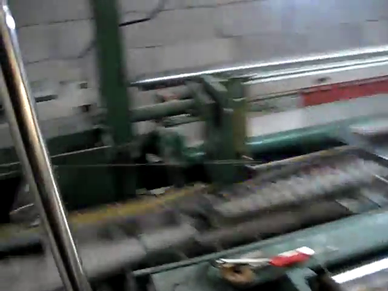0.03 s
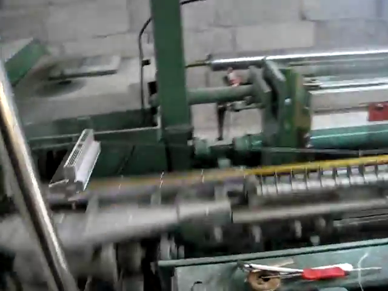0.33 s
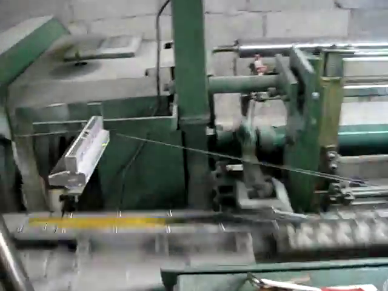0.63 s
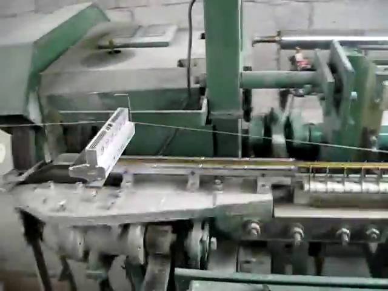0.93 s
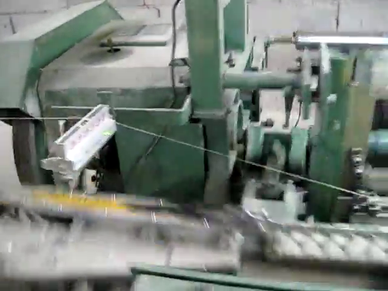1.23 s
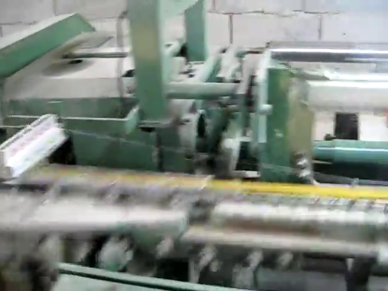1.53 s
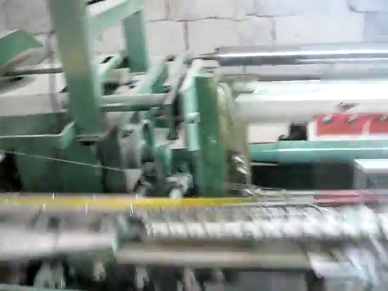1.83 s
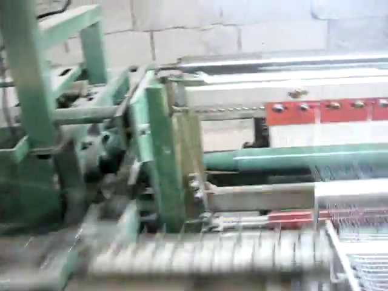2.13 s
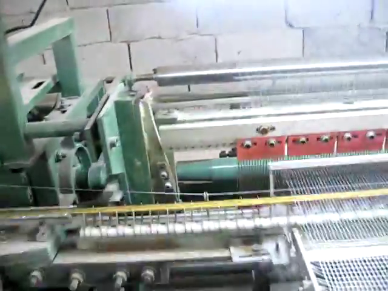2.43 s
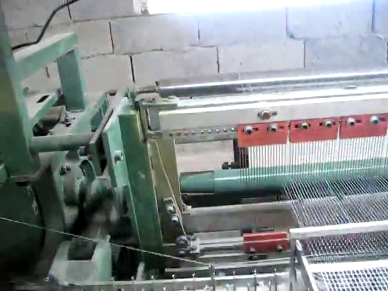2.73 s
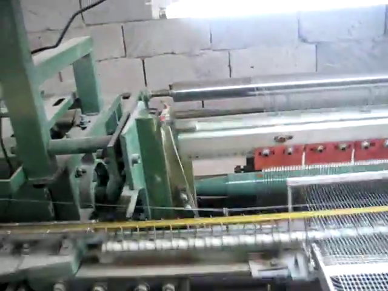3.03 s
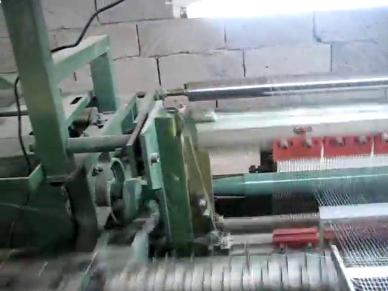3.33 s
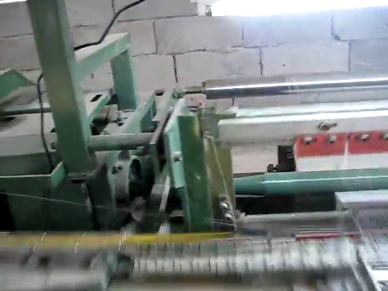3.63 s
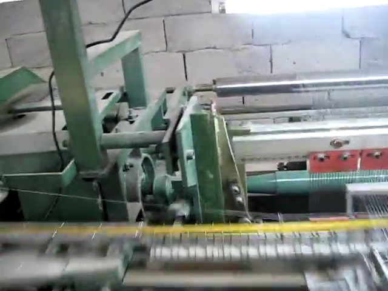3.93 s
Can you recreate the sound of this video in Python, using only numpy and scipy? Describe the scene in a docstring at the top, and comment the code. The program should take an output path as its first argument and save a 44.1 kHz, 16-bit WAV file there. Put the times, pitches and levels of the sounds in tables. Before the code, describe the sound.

Close to the microphone, a loud weaving loom clatters steadily over grinding gears. Hissing strokes, short metal squeals and sharp clacks repeat about twice a second, the clacks echoing briefly off the workshop walls.

```python
"""A rapier loom weaves close by in a block-walled shed, about two turns a second, over droning gears
and a motor. Each turn opens with a rush from the drive, and the rapiers (rods that carry the thread)
hiss in. A catch snaps, the sley (the swinging comb) rumbles, dry guides squeal and, in most turns,
a sheet-metal cover booms. Then steel parts meet in a quick run of clacks as the rapiers hiss out.
Now and then a lever knocks, a spring whistles or a loose part ticks."""
import sys
import numpy as np
from scipy import signal
from scipy.fft import rfft, irfft
from scipy.io import wavfile

SR = 44100
rng = np.random.default_rng(int(sys.argv[2]) if len(sys.argv) > 2 else 0)


def wav_out(sig):
    """Save sig, one row per channel (or a flat mono array), as 16-bit PCM at SR to the path in sys.argv[1]."""
    wavfile.write(sys.argv[1], SR, np.round(np.clip(np.atleast_2d(sig).T, -1, 1) * 32767).astype(np.int16))


N = 176400
T = np.arange(N) / SR

# Turns of the main shaft. Each row: start in seconds, then how many dB louder or softer this turn
# makes the drive, rapiers, sley, clacks, squeaks, cover and squeal.
SHAFT_TURNS = [(0, -1, -0.5, 2, -2, -0.5, 3.5, 2.5), (0.5171, -1.5, 0, -0.5, -2.5, 2, 1.5, 3),
               (1.032, -3.5, 0, 3, -3.5, 0.5, 0, 2), (1.5487, -4, 0, 2, -3.5, 1.5, -6, 3.5),
               (2.065, -4.5, -0.5, 1, -2, 1, -24, 0), (2.5815, -1.5, -1.5, 1.5, -3.5, 1.5, -11, 2.5),
               (3.0988, -3, -0.5, 0.5, -2, -0.5, -3.5, -2), (3.615, -3.5, -1, 2, -2.5, 2, -23, -2.5)]
# Notes at which the cast frame rings. Each row: pitch in Hz, width in Hz, boost in dB.
FRAME_NOTES = [(280.7, 17, 6.5), (372, 7.1, 5), (892, 11, 4.5), (1090, 20, 1), (1205, 12, 4),
               (1425, 39, 5.5), (1670, 56, 5), (1960, 23, 3.5)]

# The tone colour of each part's noise. Each row: frequency in Hz, relative strength there in dB.
GEAR_COLOUR = [(25, -48), (160, -8), (280, -3), (500, -2.5), (900, 0.5), (1300, -0.5), (1900, 3.5),
               (3000, 1), (5000, -0.5), (7000, -3), (9000, -5), (11500, -4), (13000, -1), (14500, -24),
               (16000, -5.5)]
COVER_COLOUR = [(330, -36), (362, -4), (374, 6), (385, -13), (420, -25), (700, -16.5), (880, -8),
                (1100, -18), (4000, -46)]
GUIDE_COLOUR = [(3000, -35), (5500, -26), (7300, 10), (8600, 7), (10000, 0), (11500, 10.5), (13000, 12.5),
                (16000, -18)]
SLEY_COLOUR = [(25, -34), (50, -12), (100, -13.5), (180, -8), (290, -2), (400, -1), (550, -4), (850, 2.5),
               (1400, -5), (2800, -4.5), (7000, -17.5), (16000, -44)]
DRIVE_COLOUR = [(200, -13), (500, -9), (900, 3), (1400, -0.5), (2100, -1.5), (2900, -6.5), (5000, -11),
                (9000, -52)]
RAPIER_COLOUR = [(500, -28), (1800, -6.5), (3500, -5), (6500, -2.5), (9000, -1.5), (11000, 4), (12800, 4.5),
                 (14500, -7.5), (16000, -5)]
KNOCK_COLOUR = [(300, -13), (1700, -3.5), (2300, 5), (3200, -15), (4100, 0), (5200, -6), (16000, -23)]
CATCH_COLOUR = [(200, -21), (1400, -2), (3000, -16), (4700, -3.5), (6200, -18), (10100, -3), (10800, -11),
                (11500, 0), (12900, 7), (13900, -3), (14300, -10)]

# Moments when a moving part is loudest.
# Each row: seconds into the turn, level in dB, rise time in seconds, fall time in seconds.
COVER_SWELLS = [(.285, -32.5, 0.086, 0.06)]
GUIDE_SWELLS = [(.222, -29.5, 0.022, 0.02), (.29, -25, 0.039, 0.021)]
SLEY_SWELLS = [(.022, -26, 0.016, 0.042), (.19, -28.5, 0.032, 0.013), (.272, -26.5, 0.027, 0.063),
               (.302, -29, 0.0061, 0.011), (.356, -26.5, 0.019, 0.021), (.46, -33.5, 0.051, 0.056)]
DRIVE_SWELLS = [(-.005, -21, 0.032, 0.017), (.033, -20, 0.014, 0.022), (.19, -25, 0.0064, 0.04)]
RAPIER_SWELLS = [(.04, -21, 0.021, 0.058), (.09, -20, 0.039, 0.055), (.36, -19, 0.014, 0.0066),
                 (.41, -19.5, 0.034, 0.051), (.475, -25.5, .03, 0.028)]

# Parts that ring or squeak. Each row: delay in seconds, pitch in Hz, slide in Hz per second, level in dB,
# rise in seconds, seconds to fade by 60 dB, flutter speed in Hz, roughness (0 is pure, 1 or more is rough).
SQUEAK_NOTES = [(.002, 1650, 10000, -22.5, 0.037, 0.075, 130, 0.7),
                (.008, 954, 3000, -28, 0.018, .07, 90, 0.7), (.024, 1507, 0, -24, .002, .09, 110, .8),
                (0.178, 4025, 0, -24.5, 0.0018, 0.2, 300, 1),
                (0.178, 2425, 0, -24, 0.0033, 0.079, 200, 0.8),
                (0.207, 11400, 0, -20.5, 0.0038, 0.084, 220, 0.6),
                (.212, 2820, -2500, -24.5, 0.016, 0.2, 130, .85),
                (0.256, 7400, -7000, -25.5, 0.0091, .16, 190, 1.2)]
# A dry guide sings faintly, squeals and breaks up. The rows read like the squeaks.
SQUEAL_NOTES = [(.254, 4430, 0, -31, .02, .3, 70.2, 0.67), (0.284, 4320, 2800, -19.5, 0.02, 0.09, 60, 0.23),
                (.309, 4670, 0, -21.5, 0.0024, 0.083, 280, 0.9)]
# The low and the high note of a spring. The rows read like the squeaks.
SPRING_NOTES = [(0, 6715, 0.0022, 0, 0.0054, 0.19, 30.02, 0.32), (0, 11300, 0, 0, 0.004, 0.12, 30, .15)]
# Whistles of that spring. Each row: start in seconds, low note's level in dB, high note's level in dB.
SPRING_WHISTLES = [(0.312, -40, -15.5), (1.344, -23, -16), (2.893, -40, -20), (3.41, -30, -17),
                   (3.927, -24, -25)]

# Ticks of loose parts, and knocks of the levers. Each row: start in seconds, level in dB.
LOOSE_TICKS = [(1.41, -7), (1.9505, -15), (2.6755, -22), (2.702, -4)]
LEVER_KNOCKS = [(0.176, -20), (1.7268, -17), (1.9046, -17), (2.2413, -19), (2.4215, -17), (2.9252, -19),
                (3.452, -17), (3.9686, -17)]
# Steel hitting steel in every turn. Each row: seconds into the turn, thud level in dB,
# clank level in dB, tick level in dB, rise in seconds, seconds to fade by 60 dB.
STEEL_HITS = [(.125, -59, -34, -26, 0.00083, 0.035), (0.1766, -30, -17.5, -26, 0.00052, 0.046),
              (0.3095, -28, -16, -13, 0.0011, 0.047), (.3440, -21.5, -15, -18, 0.0003, 0.039),
              (0.3534, -21.5, -22, -21, 0.00024, 0.056), (0.3769, -21, -10.5, -3, 0.00093, 0.0096),
              (0.3837, -40, -11, -4.5, 0.00026, 0.011)]


def from_db(db):
    """Turn decibels into a number to multiply the sound by."""
    return 10 ** (np.asarray(db) / 20)


def unit_power(x):
    """Scale a signal so that its average power is 1."""
    return x / np.sqrt(np.mean(x ** 2) + 1e-20)


def dying(t, fade_s):
    """A curve that falls by 60 dB every fade_s seconds."""
    return np.exp(-np.log(1000) * t / fade_s)


def drift(hz, size):
    """A smooth random wobble, mostly slower than hz."""
    freqs = np.arange(size // 2 + 1) * SR / size
    return unit_power(irfft(rfft(rng.standard_normal(size)) / (1 + (freqs / hz) ** 2), size))


def add(out, start_s, sound):
    """Mix a sound in at the given time."""
    i = max(int(start_s * SR), 0)
    out[i:i + len(sound)] += sound[:max(N - i, 0)]


def band_pass(x, band_hz):
    """Keep one band of frequencies, boosted so that white noise keeps its power."""
    sos = signal.butter(2, band_hz, "band", fs=SR, output="sos")
    return signal.sosfilt(sos, x + 1e-18) * np.sqrt(SR / 2 / (band_hz[1] - band_hz[0]))


def rubbing(colour, grain_db):
    """Friction: coloured noise broken into tiny grains. More grain_db makes it grittier."""
    hz, db = np.transpose(colour)
    grains = rng.standard_normal(N) * from_db(grain_db * drift(hz=340, size=N))
    freqs = np.maximum(np.arange(N // 2 + 1) * SR / N, 1)
    gains = from_db(np.interp(np.log(freqs), np.log(hz), db))
    return unit_power(irfft(rfft(grains) * gains, N))


def shed_echo(x, fade_s=0.67, level_db=-5.5):
    """The block walls throw the sound back as a dull wash, starting 8 ms later."""
    t = np.arange(SR) / SR
    tail = rng.standard_normal(SR) * dying(t, fade_s) * (t > .008)
    tail /= np.sqrt(np.sum(tail ** 2))
    dull_tail = signal.sosfilt(signal.butter(1, 4000, fs=SR, output="sos"), tail)
    return from_db(level_db) * signal.fftconvolve(x, dull_tail)[:N]


def ringing_frame(x):
    """The cast frame rings along with its parts, boosting its own notes."""
    return x + sum((from_db(db) - 1) * signal.lfilter(*signal.iirpeak(hz, hz / width, fs=SR), x)
                   for hz, width, db in FRAME_NOTES)


def motor_hum(hz=49.8, level_db=-66.5):
    """The motor hums on one faint, low note."""
    return from_db(level_db) * np.sqrt(2) * np.sin(2 * np.pi * hz * T)


def gear_drone(level_db=-25.5):
    """The gears rub all the time, making a steady, grainy noise."""
    return from_db(level_db) * rubbing(GEAR_COLOUR, grain_db=2.5)


def moving_part(starts, turn_db, swells, colour, turn_s=.5163):
    """A part rubs louder as it gathers speed, at the same points of every turn."""
    power = np.zeros(N)
    for start, db in zip(starts, turn_db):
        for peak_s, level_db, rise_s, fall_s in swells:
            t = T - start - peak_s
            near = np.abs(t) < turn_s / 2
            width_s = np.where(t[near] < 0, rise_s, fall_s)
            power[near] += from_db(db + level_db) ** 2 * np.exp(-(t[near] / width_s) ** 2)
    return np.sqrt(power) * rubbing(colour, grain_db=2)


def singing_parts(starts, levels_db, notes, spread_db=1.0, detune=.0005):
    """Springs and guides sing briefly, some cleanly and some as a rough scrape."""
    out, t = np.zeros(N), np.arange(SR // 5) / SR
    for start, level_db in zip(starts, levels_db):
        for delay_s, hz, slide, db, rise_s, fade_s, flutter_hz, rough in notes:
            level_chance, pitch_chance = rng.standard_normal(2)
            rough = min(rough, 1)
            # A complex wobble shakes both the loudness and the pitch.
            wobble = drift(flutter_hz, len(t)) + 1j * drift(flutter_hz, len(t))
            flutter = np.sqrt(1 - rough) + np.sqrt(rough / 2) * wobble
            pitch_hz = hz * (1 + detune * pitch_chance) + slide * t
            tone = np.real(flutter * np.exp(2j * np.pi * np.cumsum(pitch_hz) / SR))
            envelope = np.minimum(t / rise_s, 1) * dying(np.maximum(t - rise_s, 0), fade_s)
            add(out, start + delay_s, from_db(db + level_db + spread_db * level_chance) * envelope * tone)
    return out


def spring_whistles():
    """A plucked spring rings on two clear notes, in a different balance each time."""
    starts, *note_db = np.transpose(SPRING_WHISTLES)
    return sum(singing_parts(starts, db, [note]) for db, note in zip(note_db, SPRING_NOTES))


def loose_ticks():
    """Now and then a loose steel part gives one bright tick."""
    out, t = np.zeros(N), np.arange(SR // 20) / SR
    for start, db in LOOSE_TICKS:
        add(out, start, from_db(db) * dying(t, fade_s=0.007) * rng.standard_normal(len(t)))
    return band_pass(out, band_hz=(8530, 13700))


def hard_blows(starts, levels_db, colour, hold_s, fade_s):
    """Struck steel rings on so many close notes that it sounds like noise: it holds, then dies fast."""
    envelope, t = np.zeros(N), np.arange(SR // 10) / SR
    for start, db in zip(starts, levels_db):
        add(envelope, start, from_db(db) * dying(np.maximum(t - hold_s, 0), fade_s))
    return envelope * rubbing(colour, grain_db=0)


def steel_clacks(starts, turn_db, jitter_s=.0003, spread_db=1):
    """Each hit is a dying burst in the frame (thud), the levers (clank) and small steel parts (tick)."""
    thud_hz, clank_hz, tick_hz = (220, 1140), (1530, 5960), (8840, 13600)
    alike = 0.74  # share of a burst's power that is the same noise in every turn
    out, t = np.zeros(N), np.arange(SR // 8) / SR
    times = starts[:, None] + np.array(STEEL_HITS)[:, 0]
    times += jitter_s * rng.standard_normal(times.shape)
    for band, band_hz in enumerate((thud_hz, clank_hz, tick_hz)):
        bursts = np.zeros(N)
        for hit_times, (_, *band_db, rise_s, fade_s) in zip(times.T, STEEL_HITS):
            same_noise = rng.standard_normal(len(t))
            envelope = dying(t, fade_s) * (1 - np.exp(-t / rise_s))
            for start, db in zip(hit_times, turn_db):
                noise = np.sqrt(alike) * same_noise + np.sqrt(1 - alike) * rng.standard_normal(len(t))
                gain = from_db(db + band_db[band] - spread_db * rng.standard_normal())
                add(bursts, start, gain * envelope * noise)
        out += band_pass(bursts, band_hz)
    return out


def scene():
    """The whole loom, the same in both channels. Only the steel hits echo off the walls."""
    starts, drive_db, rapier_db, sley_db, clack_db, squeak_db, cover_db, squeal_db = np.transpose(
        SHAFT_TURNS)
    drive = moving_part(starts, drive_db, DRIVE_SWELLS, DRIVE_COLOUR)
    rapiers = moving_part(starts, rapier_db, RAPIER_SWELLS, RAPIER_COLOUR)
    sley = moving_part(starts, sley_db, SLEY_SWELLS, SLEY_COLOUR)
    guides = moving_part(starts, squeak_db, GUIDE_SWELLS, GUIDE_COLOUR)
    cover = moving_part(starts, cover_db, COVER_SWELLS, COVER_COLOUR)
    friction = drive + rapiers + sley + guides + gear_drone()
    catch = hard_blows(starts + .2025, clack_db - 8.5, CATCH_COLOUR, hold_s=0.003, fade_s=0.031)
    levers = hard_blows(*np.transpose(LEVER_KNOCKS), KNOCK_COLOUR, hold_s=0.0018, fade_s=0.043)
    steel = steel_clacks(starts, clack_db) + catch + levers + loose_ticks()
    squeaks = singing_parts(starts, squeak_db, SQUEAK_NOTES)
    squeals = singing_parts(starts, squeal_db, SQUEAL_NOTES)
    singing = squeaks + squeals + spring_whistles()
    loom = ringing_frame(friction + singing + steel + shed_echo(steel)) + cover + motor_hum()
    return np.array([loom, loom])


def gain_control(x, limit_db=-5.5, share=0.77, attack_s=0.0026, recover_db_per_s=74):
    """A peak over the limit turns the volume down by a share of the excess; then it creeps back."""
    over_db = np.maximum(20 * np.log10(np.abs(x).max(axis=0) + 1e-9) - limit_db, 0)
    held_db = np.maximum.accumulate(over_db + recover_db_per_s * T) - recover_db_per_s * T
    smoothing = np.exp(-1 / (attack_s * SR))
    smooth_db = signal.lfilter([1 - smoothing], [1, -smoothing], held_db)
    return x * from_db(-share * smooth_db)


def record(dry):
    """The microphone loses a band of treble, the volume dips after loud clacks, and the very top is cut."""
    notch_hz, notch_width_hz, cutoff_hz = 7880, 1760, 15800
    notched = signal.lfilter(*signal.iirnotch(notch_hz, notch_hz / notch_width_hz, fs=SR), dry)
    low_pass = signal.ellip(12, .2, 80, cutoff_hz, fs=SR, output="sos")
    return signal.sosfilt(low_pass, gain_control(notched))


dry = scene()
out = record(dry)
wav_out(out)
```